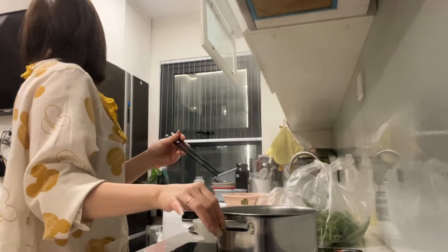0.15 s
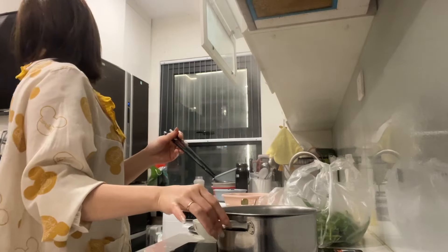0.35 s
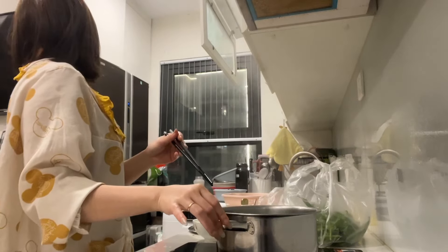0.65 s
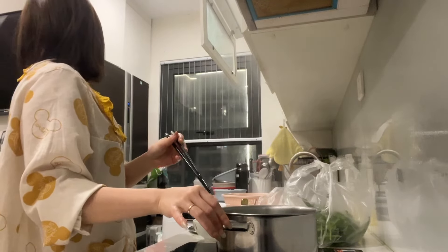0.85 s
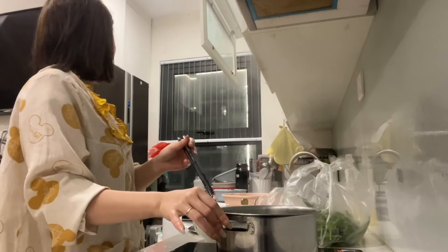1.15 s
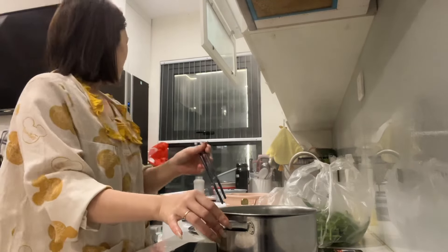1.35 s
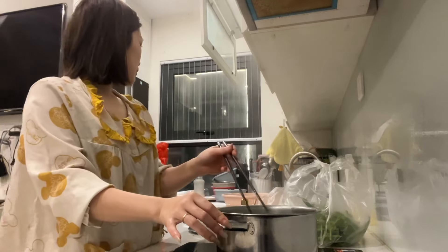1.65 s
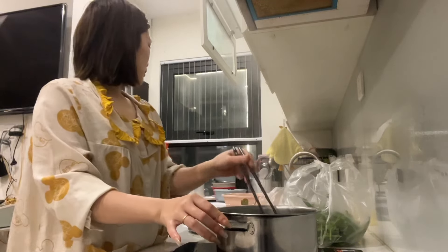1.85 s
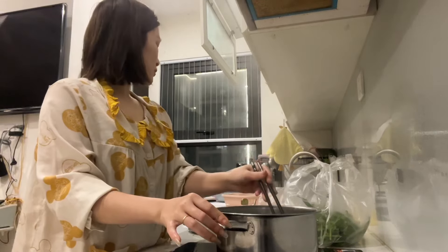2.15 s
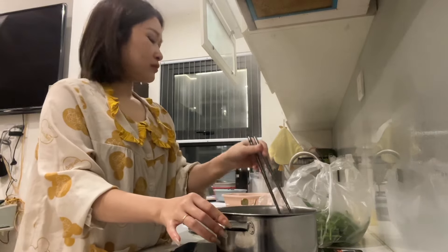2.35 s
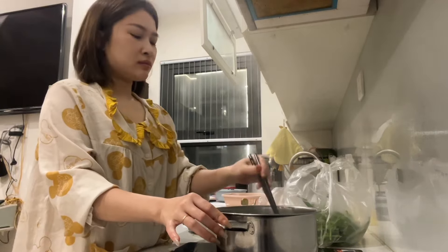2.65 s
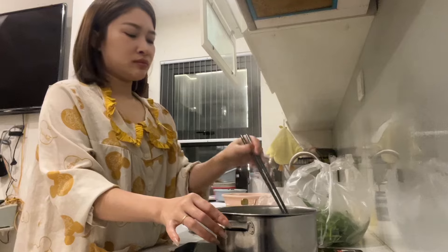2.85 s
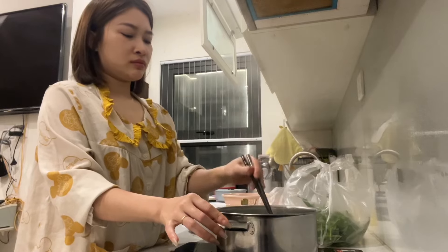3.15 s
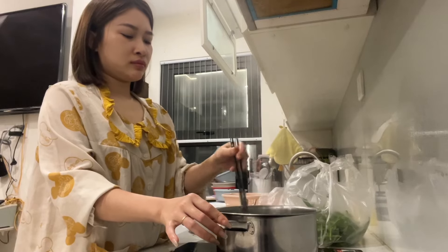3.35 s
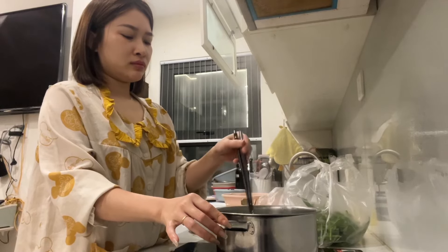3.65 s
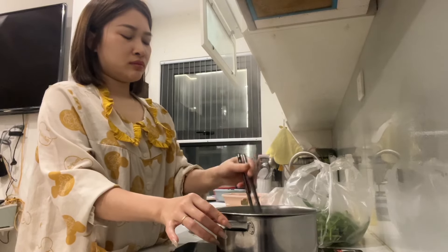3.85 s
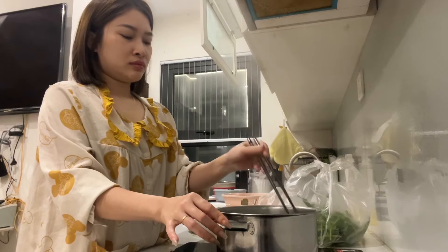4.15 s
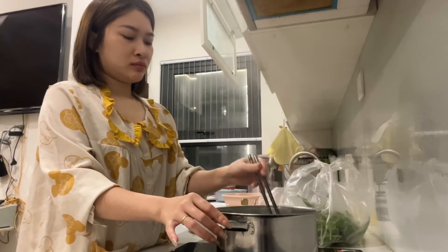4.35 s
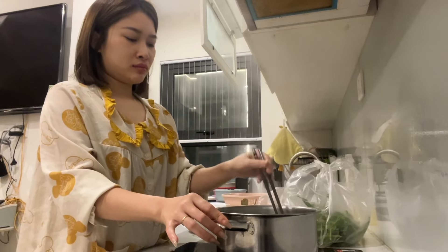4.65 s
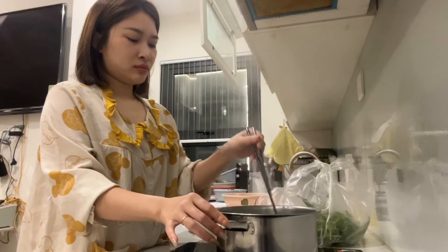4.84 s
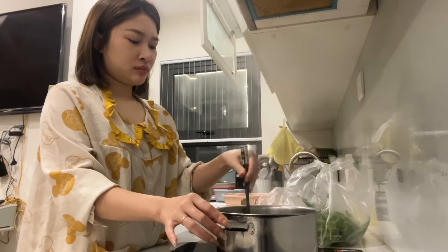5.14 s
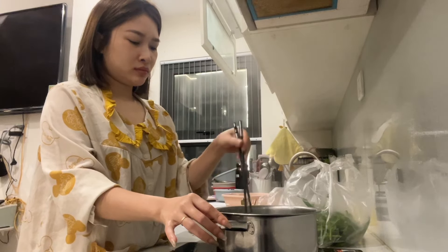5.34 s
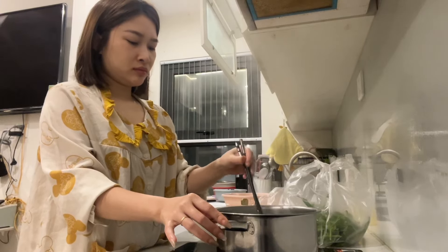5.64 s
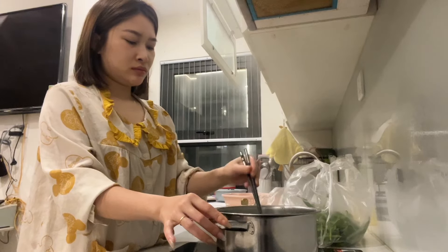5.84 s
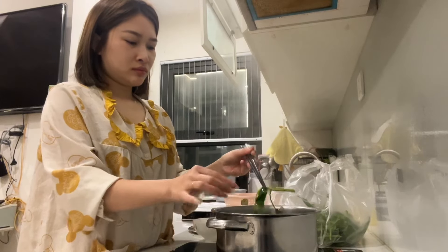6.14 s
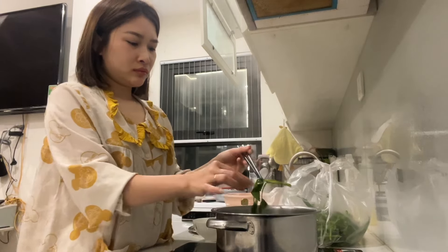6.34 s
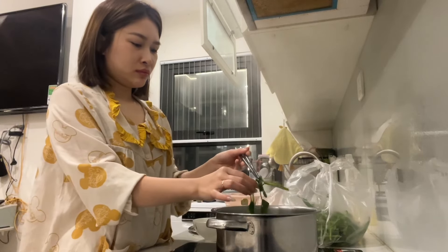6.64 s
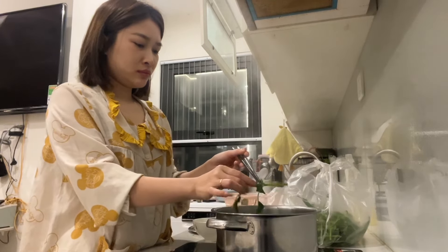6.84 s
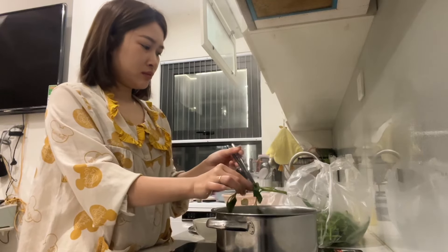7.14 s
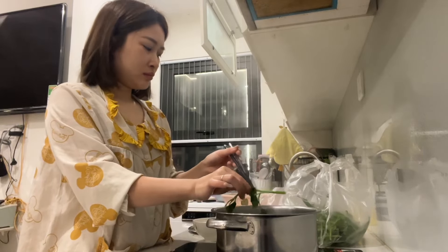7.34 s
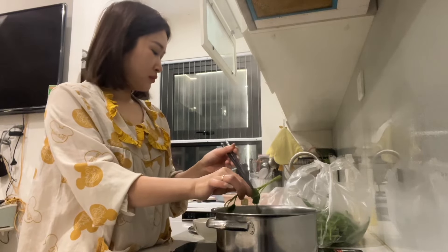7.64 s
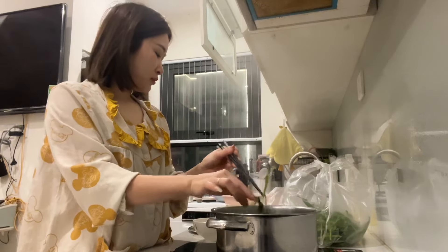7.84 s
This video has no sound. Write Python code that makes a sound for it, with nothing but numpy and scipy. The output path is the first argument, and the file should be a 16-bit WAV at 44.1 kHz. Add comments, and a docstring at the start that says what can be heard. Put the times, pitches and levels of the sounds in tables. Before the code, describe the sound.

A cooker hood drones loudly and steadily while chopsticks lightly stir a steel pot of simmering water, with a few sharp metallic clinks.

```python
"""A cooker hood hums loudly over a steel pot of simmering water in a small tiled kitchen.
Its motor drones as wavering sines at twice the mains frequency and above; its fan rushes as shaped noise
with duct resonances. Chopsticks stir the pot, grazing it and now and then knocking it: short noise cracks
and decaying modes. Large bubbles plop as rising sines over the small ringing bubbles of the simmer."""
import sys
import numpy as np
from scipy import signal
from scipy.fft import rfft, irfft
from scipy.io import wavfile

SR = 44100
rng = np.random.default_rng(int(sys.argv[2]) if len(sys.argv) > 2 else 0)


def transcribe(u):
    """Save the signal u as a 16-bit wav file named by the first command-line argument.

    u: samples, shape (n,) or (channels, n), limited to [-1, 1]; the rate is SR.
    q: integer samples, one column per channel.
    """
    v = np.clip(np.atleast_2d(u).T, -1, 1)
    q = np.round(v * 32767).astype(np.int16)
    wavfile.write(sys.argv[1], SR, q)


N = 352342

# how strongly the water boils, shared by its bubbles and its churn: t/s, level/dB
SIMMER_LEVEL = [(0, -50), (1, -53), (2, -50.5), (2.7, -53.5), (3.4, -48.5), (4.3, -58), (5.5, -52),
                (6.5, -59), (7.3, -58), (8, -55)]


def from_db(db):
    """Decibels to gain."""
    return 10 ** (np.asarray(db) / 20)


def rms_one(x):
    """Scale to unit power."""
    return x / np.sqrt(np.mean(x ** 2) + 1e-20)


def in_time(rows):
    """Join (t/s, value) rows by straight lines."""
    return np.interp(np.arange(N) / SR, *np.transpose(rows))


def drift(rate):
    """Slow chance of spread 1, changing about rate times a second."""
    hz = np.arange(N // 2 + 1) * SR / N
    smoothing = (1 + (hz / rate) ** 2) ** 2
    return rms_one(irfft(rfft(rng.standard_normal(N)) / smoothing, N))


def coloured(x, spectrum):
    """Equalise a signal along (f/Hz, gain/dB) points, joined on a log frequency axis."""
    hz, db = np.transpose(spectrum)
    bins = np.linspace(1, SR / 2, x.shape[-1] // 2 + 1)
    gain = from_db(np.interp(np.log(bins), np.log(hz), db))
    return irfft(rfft(x) * gain, x.shape[-1])


def narrow(x, hz, quality):
    """A broad resonance, brought to unit power."""
    return rms_one(signal.lfilter(*signal.iirpeak(hz, max(quality, 1), fs=SR), x))


def ring(x, hz, t60):
    """Two-pole resonator: a unit click sets a decaying sine of height 1 ringing."""
    r = from_db(-60 / (t60 * SR))
    w = 2 * np.pi * hz / SR
    return signal.lfilter([0, np.sin(w)], [1, -2 * r * np.cos(w), r * r], x + 1e-18)


def fade(t, t60):
    """Exponential decay, 60 dB down after t60."""
    return np.exp(-np.log(1000) * t / t60)


def add(out, s, sound):
    """Mix a sound in at time s."""
    at = max(round(s * SR), 0)
    out[:, at:at + sound.shape[-1]] += sound[..., :N - at]


def motor(flutter_db=0.43, overtone_flutter_db=2.5, spread_rad=0.12, whine_wander=.009):
    """Magnetic pull shakes the hood at a fixed rate; the air stream makes its overtones flutter."""
    motor_hz = 100.27
    # overtones of the motor: multiple, level/dB, left-right phase/rad
    overtones = [(2, -52, 0.42), (3, -54.5, 0.38), (4, -54, 0.77), (5, -61, 1), (6, -66.5, 0.56),
                 (8, -65.5, 1.1)]
    # faint wavering tones of the fan: f/Hz, level/dB
    whine = [(661, -57), (991, -72), (1234, -70), (1306, -67), (3800, -78)]
    turn = 2 * np.pi * motor_hz * np.arange(N) / SR
    ears = np.array([[.5], [-.5]])
    out = from_db(hum_db() + flutter_db * drift(6.4)) * np.sin(turn - spread_rad * ears)
    for multiple, db, apart in overtones:
        level = from_db(db + overtone_flutter_db * drift(7.3))
        out += level * np.sin(round(multiple) * turn + 1.76 * drift(2.3) + apart * ears)
    for hz, db in whine:
        phase = 2 * np.pi * np.cumsum(hz * (1 + whine_wander * drift(9.6))) / SR
        out += from_db(db + overtone_flutter_db * drift(6.2)) * np.sin(phase + 1.46 * ears)
    return np.sqrt(2) * out  # so that the levels are effective (RMS) ones


def hum_db():
    """Level of the hum over time: its slow swell and one brief dip."""
    # the hum slowly sinks and swells again: t/s, level/dB
    swell = [(0.05, -16.5), (1.54, -20.5), (2.46, -18.5), (4.09, -21.5), (5.87, -19), (6.02, -16.5),
             (6.21, -17.5), (7.9, -17.5)]
    dip_s, dip_width_s, dip_db = 3.49, .022, -4
    dip = np.exp(-((np.arange(N) / SR - dip_s) / dip_width_s) ** 2)
    return in_time(swell) + dip_db * dip


def air(gust_db=2.36, duct_side=0.29, eddy_top_hz=1500):
    """Turbulence in the fan: a broad rush that also sounds the duct's resonances."""
    # air rush common to both ears: f/Hz, density/dB per Hz
    rush_mid = [(22, -104), (38, -67.5), (60, -57), (80, -60), (115, -53.5), (165, -67.5), (260, -69.5),
                (450, -74), (750, -85), (1100, -87), (2000, -90.5), (3700, -102), (4600, -99), (6500, -99),
                (8000, -110), (10400, -94.5), (13000, -100.5), (14500, -110)]
    # air rush opposed between the ears: f/Hz, density/dB per Hz
    rush_side = [(20, -108), (60, -74), (110, -69), (160, -76), (350, -80), (700, -78), (1200, -88.5),
                 (2300, -94), (3300, -97.5), (4700, -100), (8500, -92.5), (11500, -106), (14000, -100),
                 (16000, -100)]
    # resonances of the hood and its duct: f/Hz, width/Hz, level/dB
    duct = [(228.5, 44, -51.5), (298.6, 16.5, -52.5), (630, 35, -57.5), (980, 52, -55.5), (1376, 280, -62),
            (2373, 53, -67.5), (2640, 49, -64), (3340, 290, -61), (3965, 81, -68), (5460, 55, -76.5),
            (10357, 90, -82), (10400, 97, -92)]
    # lean of the rush to one side: f/Hz, left over right/dB
    lean = np.array([(100, -1), (670, 0), (1230, -5), (2240, -2.5), (4100, 1), (7500, 1.5), (13700, 0)])
    white = rng.standard_normal((2, N)) * np.sqrt(SR / 2)  # unit power per Hz
    mid, side = coloured(white[0], rush_mid), coloured(white[1], rush_side)
    for hz, width, db in duct:
        t60 = np.log(1000) / (np.pi * width)
        common, opposed = from_db(db) * rms_one(ring(rng.standard_normal((2, N)), hz, t60))
        mid = mid + common
        side = side + duct_side * opposed
    left = coloured(mid + side, lean * [1, .5])
    right = coloured(mid - side, lean * [1, -.5])
    rush = np.array([left, right])
    # large eddies make the low roar flutter while the hiss stays even
    roar = signal.lfilter(*signal.butter(1, eddy_top_hz, fs=SR), rush)
    gusts = from_db(gust_db * np.clip(drift(36), -2, 2))
    return rush + roar * (gusts - 1)


def intake():
    """Hiss straight from the hood's mouth on the right; it reaches the right ear first."""
    # hiss at the mouth: f/Hz, density/dB per Hz
    hiss_colour = [(200, -100), (450, -79), (750, -83), (1200, -90), (2200, -89.5), (3500, -99),
                   (5700, -97.5), (7500, -103), (9500, -106.5), (13500, -105)]
    left_lag_s = .00027
    hiss = coloured(rng.standard_normal(N) * np.sqrt(SR / 2), hiss_colour)
    return np.array([np.roll(hiss, round(left_lag_s * SR)), hiss])


def knocks(crack_db=-7.5, stick_t60=0.022, touch_t60=0.006, alike=0.29, tilt_about_hz=4000):
    """Each knock is a brief chatter: the sticks crack at notes set by the grip, wall and rim ring on."""
    # firm knocks on the pot: t/s, strength/dB, contact brightness/Hz, ring of the wall/dB,
    # its tilt/dB per octave, ring of the rim/dB, left over right/dB,
    # the sticks' bending notes for that grip as (f/Hz, level/dB)
    hits = [(1.999, -19.5, 2600, -21, 7, -22, 0, [(1110, -10.5), (2720, -7), (3350, -8), (4430, -17),
            (7600, -3)]), (3.446, -16.5, 3570, -23, 4.5, -22, -0.79, [(2200, -8), (3192, -2.5),
            (6950, -7)]), (3.451, -21, 3000, -16, -3, -24, -0.42, [(2600, -8), (3192, -4)]),
            (4.9879, -14.5, 11400, -17.5, 0, -7, -1, [(3300, -12), (3550, -10), (4500, -17), (7490, -7)]),
            (5.194, -13.5, 9000, -13, 1.5, -7, -0.29, [(2100, -16), (3050, -11), (3350, -9), (5700, -10)]),
            (5.208, -22.5, 6000, -9, -1, 0, 1, [(1308, 1), (3386, -8)])]
    # modes of the water-damped pot wall: f/Hz, level/dB, t60/s
    wall_modes = [(638, -12, 0.22), (984, -15, 0.23), (1295, -4, 0.11), (1590, -3.5, 0.064),
                  (1873, -38, 0.11), (2160, -17, 0.098), (3120, -25, 0.18), (3150, -18, .15),
                  (3360, -14, 0.13), (3970, -3, 0.049), (5445, -28, 0.29), (6000, -15, .17),
                  (6030, -18, 0.12), (6830, -11, 0.11), (8000, -10, .14), (9200, -3, .06), (9600, -18, .07)]
    # colour of the sticks' own crack: f/Hz, gain/dB
    crack_colour = [(80, -2), (230, 4), (600, 11), (950, 11), (1400, 1), (2300, 7), (3600, 5), (4800, 1),
                    (6000, 10), (8000, -3.5), (9500, 7.5), (12000, 6), (13500, 8), (16000, -18)]
    # the stick meets the wall and chatters for a moment, then its crack is over at once
    contact_s, chatter_s, crack_t60 = .014, .0034, .019
    # clean and rattling shares of the sticks' notes, and the sharpness of the rattle
    stick_pure, stick_rough, stick_quality = .42, .46, 11
    rim_hz, rim_gain_db, rim_t60 = 8198, -2.5, .07
    out, t = np.zeros((2, N)), np.arange(SR // 3) / SR
    right = np.array([[0], [1]])
    released = np.maximum(t - chatter_s, 0)
    for s, db, bright_hz, wall_db, tilt_db, rim_db, pan_db, notes in hits:
        noise = rng.standard_normal((3, len(t)))
        chatter = noise[:2] + alike * noise[2]
        crack = rms_one(coloured(chatter, crack_colour))
        knock = from_db(crack_db) * crack * fade(released, crack_t60)
        for hz, note_db in notes:
            # the sticks rattle against each other, which roughens their notes
            pure = np.sin(2 * np.pi * hz * t + right)
            note = stick_pure * pure + stick_rough * narrow(chatter, hz, stick_quality)
            knock += from_db(note_db) * note * fade(released, stick_t60)
        rim = np.sin(2 * np.pi * rim_hz * t + np.pi / 2 * right)
        knock += from_db(rim_gain_db + rim_db) * rim * fade(t, rim_t60)
        knock *= 1 - fade(t, contact_s)
        for hz, mode_db, t60 in wall_modes:
            # where the stick lands decides whether the low or the high modes answer
            phase = rng.uniform(0, 2 * np.pi) + rng.normal(0, .7, (2, 1))
            strength = from_db(wall_db + mode_db + tilt_db * np.log2(hz / tilt_about_hz))
            mode = np.sin(2 * np.pi * hz * t + phase)
            knock += strength * mode * fade(t, t60) * (1 - fade(t, touch_t60))
        # a soft contact loses the treble
        softness = signal.butter(1, min(bright_hz, .45 * SR), fs=SR)
        add(out, s, from_db(db + pan_db * (1.0 - right)) * signal.lfilter(*softness, knock))
    return out


def thud():
    """A knock jolts the full pot on its stand: a low, hollow note that builds and dies quickly."""
    # the jolt: t/s, level/dB, f/Hz, build-up/s, t60/s
    s, db, hz, build_s, t60 = (2.012, -14, 233, .05, .052)
    out, t = np.zeros((2, N)), np.arange(SR // 5) / SR
    note = np.sin(2 * np.pi * hz * t)
    add(out, s, from_db(db) * note * (1 - fade(t, build_s)) * fade(t, t60))
    return out


def ticks(alike=.8, onset_s=0.0029):
    """A stick brushes the wall or its partner: a short dry rasp around one pitch."""
    # glancing touches that leave the pot silent: t/s, level/dB, f/Hz, left over right/dB
    touches = [(0.113, -49, 6000, 4), (0.482, -36.5, 1580, -2), (0.64, -46, 2400, 0),
               (0.842, -45, 2200, -2), (1.184, -47, 3420, 0), (2.368, -39, 1200, -2), (2.509, -38, 1800, 0),
               (2.787, -41, 1770, 3), (2.873, -51, 5500, 2), (2.934, -50, 6000, 1), (3.028, -42, 1450, -2),
               (3.188, -51, 1750, 0), (3.286, -41, 1510, -2), (3.399, -43, 6500, 3), (4.157, -41, 2000, -2),
               (4.415, -42, 1700, 2), (4.617, -51, 5150, 4), (4.709, -43, 1500, 2), (6.658, -48, 5200, 0),
               (6.741, -43, 1770, -1)]
    rasp_t60, rasp_quality = 0.07, 1.74
    out, t = np.zeros((2, N)), np.arange(SR // 8) / SR
    for s, db, hz, pan_db in list(touches) + grazes():
        noise = rng.standard_normal((3, len(t)))
        rasp = narrow(noise[:2] + alike * noise[2], hz, rasp_quality)
        rasp = narrow(rasp, hz, rasp_quality)
        envelope = fade(t, rasp_t60) * (1 - fade(t, onset_s))
        add(out, s, from_db(db + pan_db * np.array([[.5], [-.5]])) * rasp * envelope)
    return out


def grazes():
    """The stirring sticks graze the pot faintly at random; rows of t/s, level/dB, f/Hz, left over right/dB."""
    per_s, level_db, spread_db = 3, -47, 1.5
    note_hz, spread_octaves = 1870, 0.39
    times = np.flatnonzero(rng.random(N) < per_s / SR) / SR
    rows = []
    for s in times:
        force, grip, pan_db = rng.standard_normal(3)
        rows.append((s, level_db + spread_db * force, note_hz * 2 ** (spread_octaves * grip), pan_db))
    return rows


def plops(rise_per_s=1.0, apart_rad=0.28):
    """A large bubble rings, rising slightly in pitch as it opens, and splashes; low ones last longer."""
    # large bubbles: t/s, level/dB, f/Hz
    bubbles = [(0.097, -32, 513), (0.479, -30, 990), (0.481, -32, 523), (0.744, -35, 557),
               (1.018, -34, 473), (1.385, -32, 450), (1.872, -34, 700), (1.99, -42, 900), (2.004, -25, 530),
               (2.02, -30.5, 444), (2.506, -30, 494), (3.592, -32, 624), (3.615, -33, 600),
               (4.316, -34, 484), (4.316, -35, 935), (5.866, -32, 640), (7.147, -37, 400),
               (7.148, -35, 1070), (7.306, -33, 500)]
    ring_cycles = 14
    splash_db, splash_quality = 0, 5  # level against the note
    out, t = np.zeros((2, N)), np.arange(SR // 5) / SR
    ears = np.array([[0], [1]])
    for s, db, hz in bubbles:
        note = np.sin(2 * np.pi * hz * (t + rise_per_s * t * t / 2) + apart_rad * ears)
        splash = from_db(splash_db) * narrow(rng.standard_normal((2, len(t))), hz, splash_quality)
        envelope = fade(t, ring_cycles / hz) * (1 - fade(t, 0.00024))
        add(out, s, from_db(db) * envelope * (note + splash))
    return out


def churn(level_db=-3.0, surge_db=4.5):
    """Stirring folds the water over in small uneven surges of shaped noise."""
    # colour of the stirred water: f/Hz, gain/dB
    water_colour = [(150, -4), (280, 6), (620, -7.5), (1300, -6), (2400, -11.5), (12000, -22)]
    surges = from_db(surge_db * np.clip(drift(33), -2.5, 2.2))
    wash = coloured(rng.standard_normal((2, N)), water_colour)
    return from_db(in_time(SIMMER_LEVEL) + level_db) * rms_one(wash * surges)


def simmer(per_s=260, size_db=6.0, cycles=11, low_hz=330, high_hz=2600, count=30):
    """Small bubbles burst at random across the pot, each ringing briefly at the pitch of its size."""
    out = np.zeros((2, N))
    for hz in np.geomspace(low_hz, high_hz, count):
        born = rng.random(N) < per_s / count / SR
        sizes = from_db(size_db * np.minimum(rng.exponential(1, N), 2))
        place = np.pi / 4 + rng.normal(0, 0.46, born.sum())
        clicks = np.zeros((2, N))
        clicks[:, born] = sizes[born] * np.array([np.cos(place), np.sin(place)])
        out += ring(clicks, hz, cycles / hz)
    return from_db(in_time(SIMMER_LEVEL)) * rms_one(out)


def kitchen(x, first_echo_s=0.0013, t60=0.25, treble_db=0.0):
    """Dense reflections from tiles and hood, different at each ear: decaying noise as a reverb."""
    t = np.arange(SR // 2) / SR
    # practically even in colour
    echoes = coloured(rng.standard_normal((2, len(t))), [(6400, 0.0035), (8200, treble_db)])
    echoes = echoes * fade(t, t60) * (t > first_echo_s)
    return signal.fftconvolve(x, rms_one(echoes) / np.sqrt(len(t)), axes=1)[:, :N]


def between_ears(x, opposed_hz=8000, width_hz=2200, depth=0.49):
    """Around one pitch the part common to both ears weakens and the part opposed between them grows."""
    mid, side = (x[0] + x[1]) / 2, (x[0] - x[1]) / 2
    peak = signal.iirpeak(opposed_hz, opposed_hz / width_hz, fs=SR)
    mid = mid - depth * signal.lfilter(*peak, mid)
    side = side + depth * signal.lfilter(*peak, side)
    return np.array([mid + side, mid - side])


def scene():
    """The pot sounds in the room under the hood's steady drone."""
    kitchen_db = -4
    hood = motor() + air() + intake()
    pot = knocks() + ticks() + thud() + plops() + simmer() + churn()
    return hood + between_ears(pot + from_db(kitchen_db) * kitchen(pot))


def record(dry):
    """The top is cut steeply, with no phase shift."""
    cutoff_hz = 14500
    # 10th order, 0.1 dB ripple and 70 dB rejection on each of two passes
    low_pass = signal.ellip(10, .1, 70, cutoff_hz, fs=SR, output="sos")
    return signal.sosfiltfilt(low_pass, dry)


dry = scene()
out = record(dry)
transcribe(out)
```